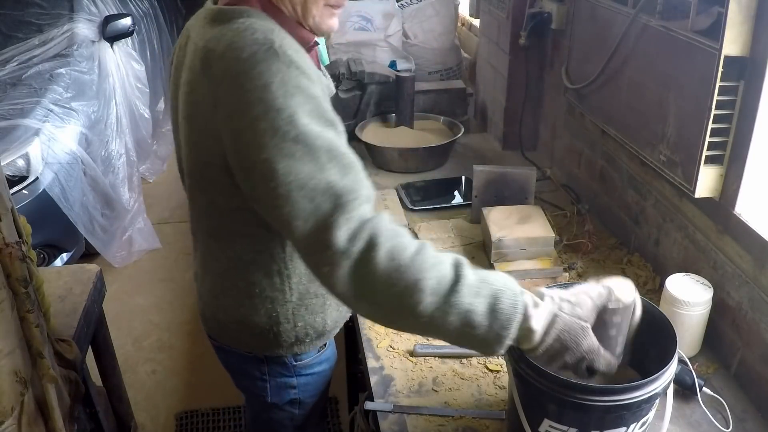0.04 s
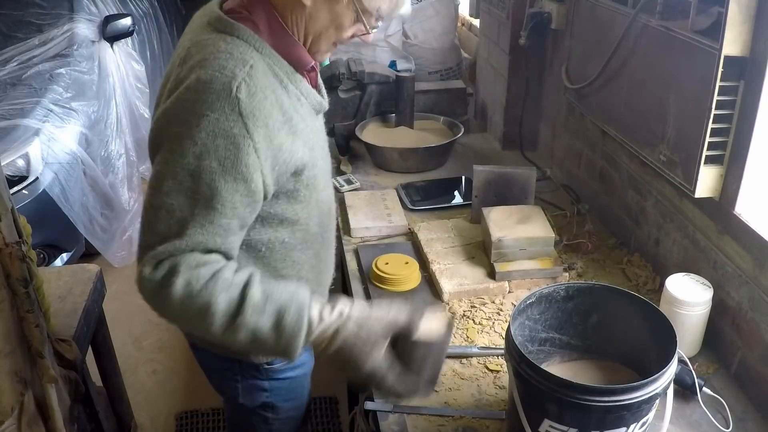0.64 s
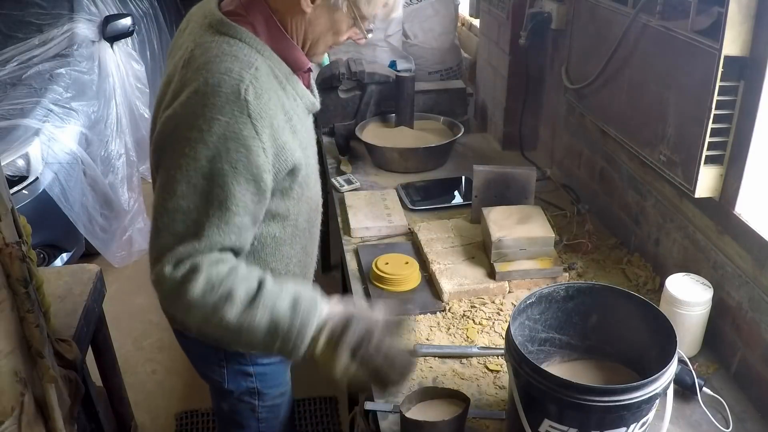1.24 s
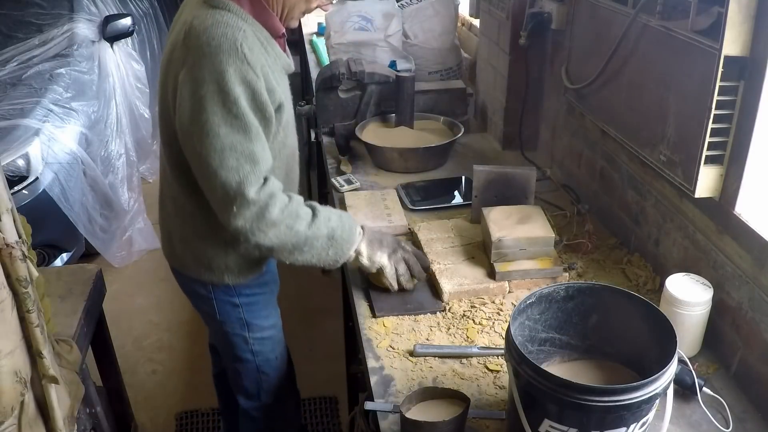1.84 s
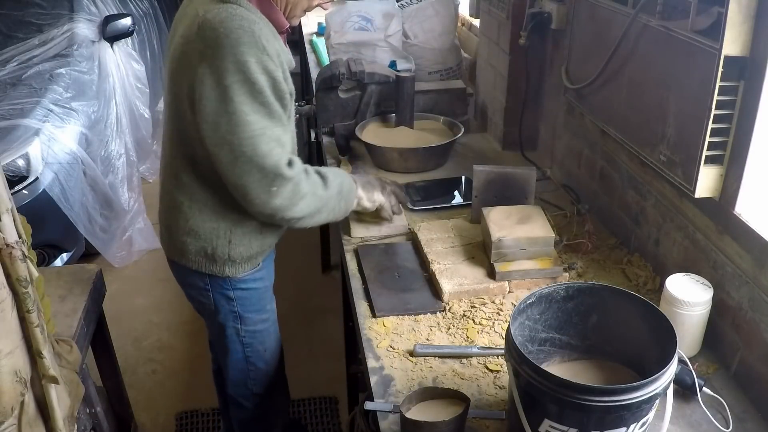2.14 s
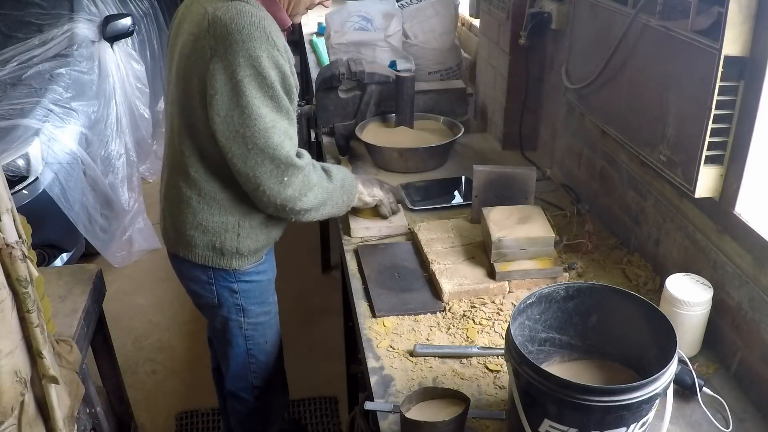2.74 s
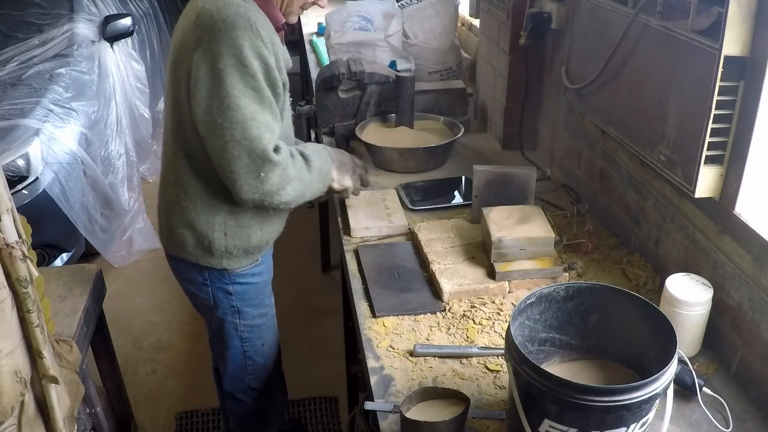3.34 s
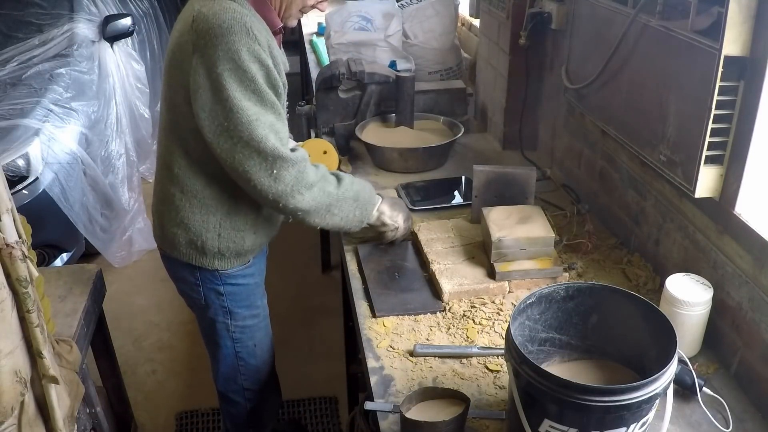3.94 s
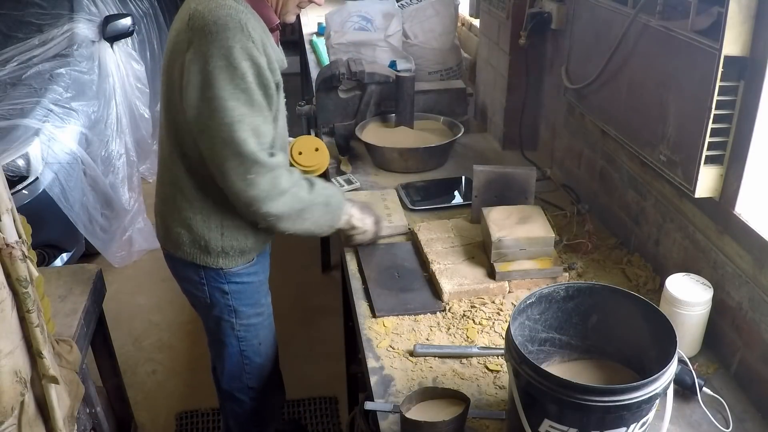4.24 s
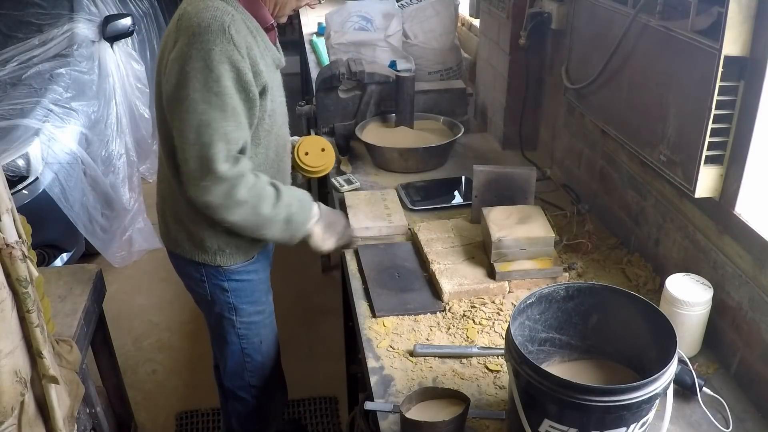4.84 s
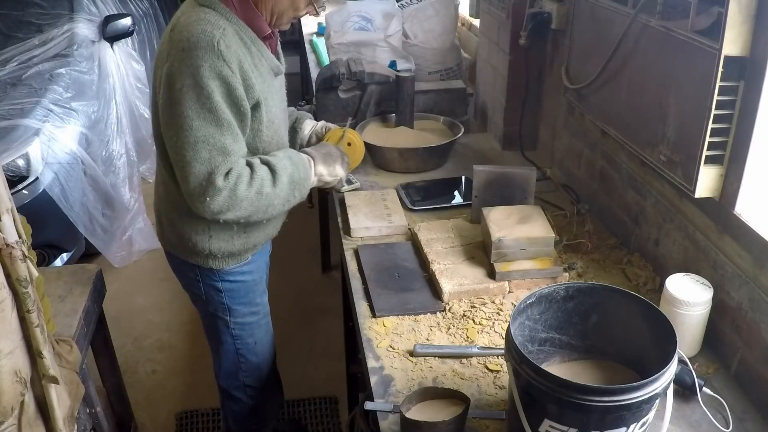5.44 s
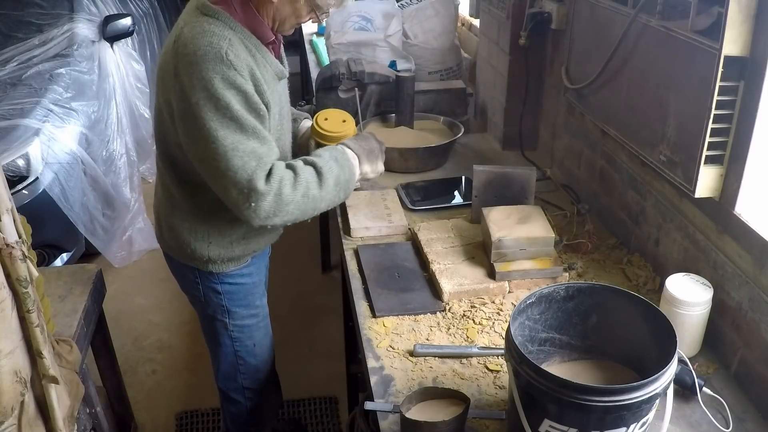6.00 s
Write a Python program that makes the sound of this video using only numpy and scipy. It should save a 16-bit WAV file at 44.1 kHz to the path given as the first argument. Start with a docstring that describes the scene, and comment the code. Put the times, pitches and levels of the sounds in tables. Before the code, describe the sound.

At the start a little sand trickles into a plastic bucket, with a scuff and a soft bump at 0.2 seconds. A sleeve rustles faintly around 0.5. At 1.1 a scoop is put down hard on a wooden bench, a loud double knock with a short skid. A brief gritty slide with a tick comes near 1.8, among soft glove rubs. At 2.5 a knock starts a prominent, hollow grinding of an object pushed over a sandy board, lasting until about 3.2. From 4.0 to 4.5, after soft thuds, a steel tool drags across a gritty plate, snapping crumbs, ringing faintly and ending with a knock. Short sweeping scrapes follow, with another knock at 5.0. Light, brighter scratches and ticks come from 5.5 to 5.8. Everything is close and fairly dry, over the faint air of a small workshop.

```python
"""Moulding work at a wooden bench in a small workshop, heard from close by.
First a scoop sheds sand into a plastic bucket, a sleeve rustles, and the scoop is put down hard.
Next a pattern is slid off a steel plate and ground over a sandy board, which rings hollow.
Last a steel tool is dragged across the gritty plate, ringing faintly, and scrapes the pattern's edge.
Friction is a train of grain impacts shaped by each body's resonances; blows excite damped modes."""
import sys
import numpy as np
from scipy import signal
from scipy.fft import rfft, irfft, next_fast_len
from scipy.io import wavfile
from scipy.ndimage import uniform_filter1d, map_coordinates

SR = 44100
rng = np.random.default_rng(int(sys.argv[2]) if len(sys.argv) > 2 else 0)


def to_wav(s):
    """Save 16-bit WAV."""
    ch = np.atleast_2d(s).T  # columns
    pcm = np.round(np.clip(ch, -1, 1) * 32767)  # PCM
    wavfile.write(sys.argv[1], SR, pcm.astype(np.int16))


N = 272097
TIME = np.arange(N) / SR
FFT_SIZE = next_fast_len(N + SR // 2, True)
HZ = np.fft.rfftfreq(FFT_SIZE, 1 / SR)

# Strokes of the steel tool: (start [s], length [s], crunch level [dB], hiss level [dB])
DRAG_STROKES = [(4.074, 0.038, -40, -44.5), (4.192, .15, -37, -39), (4.355, 0.056, -38, -35),
                (4.43, 0.045, -45, -54)]
SWEEP_STROKES = [(4.6, .035, -43, -56.5), (4.705, .04, -43, -52), (4.8, 0.13, -45.5, -52),
                 (4.835, 0.093, -37, -47), (4.945, 0.033, -31, -46)]
TRIM_STROKES = [(5.5295, 0.0047, -44, -41.5), (5.538, .03, -47, -46), (5.589, 0.074, -42.5, -49),
                (5.67, 0.051, -44, -43)]
DRAG_SHAPE = dict(attack_s=0.038, release_db_per_s=270)
SWEEP_SHAPE = dict(attack_s=0.02, release_db_per_s=330)
TRIM_SHAPE = dict(attack_s=0.002, release_db_per_s=1000)


def pattern_grind():
    """Forced vibration: sand crushed under the pattern drives the resonances of a hollow board."""
    # One long push: (time [s], crunch level [dB], hiss level [dB])
    push = [(2.485, -25, -40), (2.545, -40.5, -52), (2.621, -30, -36), (2.771, -30, -33),
            (2.803, -27.5, -35.5), (2.881, -27, -30.5), (2.979, -26.5, -35), (3.031, -28.5, -29.5),
            (3.117, -30, -36), (3.193, -62, -63), (3.26, -69, -70)]
    # Broad spectrum of the board: (frequency [Hz], level [dB])
    colour = [(120, -32), (200, -4), (248, 5), (370, 17), (550, -16), (804, -2), (1630, -11.5),
              (1850, -5.5), (2650, -39), (3670, -16.5), (15000, -40.5)]
    # Its deep, middle and high resonances: (frequency [Hz], half-width [Hz], level [dB])
    deep = [(108.6, 7.1, 15), (147, 18, 8), (249.7, 9.1, 12.5)]
    middle = [(118, 19, -26.5), (363, 370, 0), (777, 150, 5), (1843, 88, -15), (2423, 50, -12.5),
              (2997, 71, -10), (3650, 110, -10), (4280, 39, -14), (4830, 111, -17.5), (5600, 274, -17),
              (6450, 110, -40), (7160, 83, -24), (7560, 40, -42.5)]
    high = [(8730, 150, -1.5), (9300, 150, -6), (10340, 260, -3), (11850, 140, 1), (13500, 220, -3)]
    # Modes that ring on: (frequency [Hz], level [dB])
    modes = [(782, -43), (814, -42), (896, -35), (1782, -63), (2385, -71), (2968, -55), (3690, -65)]
    peaks = deep + middle + [(hz, width, db - 33) for hz, width, db in high]
    board = body(colour, peaks, broad_db=-7)
    board *= 1 - 1 / (1 + (HZ / 90) ** 8)  # little radiates below the lowest mode
    times, *columns = np.transpose(push)
    effort = [amp(np.interp(TIME, times, db, left=-np.inf, right=-np.inf)) for db in columns]
    grind = rub(effort, board, grains(rate=900, spread_db=1), fine_db=7.5, crunch_db=-0.5, hiss_db=1)
    return grind + ring(effort, modes, t60=0.13, width_hz=60, db=-4)


def pattern_slide():
    """Sliding friction: the pattern leaves the steel plate in a few short scrapes."""
    # (start [s], length [s], crunch level [dB], hiss level [dB])
    strokes = [(1.793, 0.049, -53, -57), (1.825, .043, -38.5, -43.5), (1.852, .014, -33, -48),
               (1.898, 0.03, -46, -53)]
    # Broad spectrum: (frequency [Hz], level [dB])
    colour = [(76, -41), (130, -29), (282, 0), (324, 7.5), (482, 5), (929, 5), (1380, -5.5), (1620, -25.5),
              (1940, -6), (2610, -37), (3000, -19), (4290, -15), (15000, -44.5)]
    # Resonances: (frequency [Hz], half-width [Hz], level [dB])
    peaks = [(330, 26, -6), (1370, 47, -21), (1830, 100, -17.5), (2370, 39, -16.5), (3030, 104, -19.5),
             (3680, 41, -20), (4320, 83, -23), (5400, 250, -26.5)]
    return rub(envelopes(strokes, attack_s=0.007, release_db_per_s=680), body(colour, peaks, broad_db=-12),
               grains(rate=1100, spread_db=4), fine_db=3, crunch_db=-1.5, hiss_db=0)


def tool_scrape():
    """Granular friction: the tool crushes grit on the plate, sweeps it, then trims the pattern."""
    # Broad spectrum of each contact: (frequency [Hz], level [dB])
    drag_colour = [(76, -31), (130, -1), (344, 5.5), (566, -0.5), (676, 1.5), (1360, -5), (1720, -17.5),
                   (2100, -10), (2360, -21), (3660, -25), (9880, -51.5), (11100, -47.5), (15000, -62)]
    sweep_colour = [(88, -53), (150, -26.5), (193, 1.5), (350, -2.5), (386, -1.5), (416, -13), (505, 4.5),
                    (612, -15), (1250, -19), (2700, -38), (3470, -33), (15000, -51)]
    trim_colour = [(320, -34), (550, -33), (983, -1), (1190, -14), (1430, -13.5), (2350, 0), (2740, -21.5),
                   (3610, -7.5), (3920, -6), (5540, -10), (6100, -14), (7310, -9), (8050, -20),
                   (13600, -12.5), (15000, -53)]
    # Resonances of each contact: (frequency [Hz], half-width [Hz], level [dB])
    drag_peaks = [(320, 67, 2), (1340, 77, -24), (1610, 26, -6), (1930, 55, -12), (2820, 190, -23),
                  (3700, 170, -17), (4200, 24, -35), (5060, 18, -23.5)]
    sweep_peaks = [(223, 120, -11.5), (743, 70, -11.5), (1000, 52, -14.5), (1305, 83, -14.5),
                   (1770, 110, -27), (2200, 100, -30.5)]
    trim_peaks = [(844, 150, -7), (1430, 105, -9), (1835, 78, -7.5), (2980, 110, -14), (3450, 124, -18),
                  (4130, 32, -7), (4900, 63, -5.5), (5660, 270, -8), (7140, 77, -9.5), (9300, 180, -17),
                  (11040, 71, -11.5), (13300, 35, -15), (13600, 36, -13)]
    drag = rub(envelopes(DRAG_STROKES, **DRAG_SHAPE), body(drag_colour, drag_peaks, broad_db=5),
               grains(rate=600, spread_db=1), fine_db=-9.5, crunch_db=1.5, hiss_db=2.5, judder_db=1.5)
    sweep = rub(envelopes(SWEEP_STROKES, **SWEEP_SHAPE), body(sweep_colour, sweep_peaks, broad_db=-4),
                grains(rate=1000, spread_db=1.5), fine_db=-4.5, crunch_db=-1, hiss_db=1)
    trim = rub(envelopes(TRIM_STROKES, **TRIM_SHAPE), body(trim_colour, trim_peaks, broad_db=-9.5),
               grains(rate=560, spread_db=2), fine_db=-2, crunch_db=-1, hiss_db=-1, judder_db=1.5)
    return drag + sweep + trim


def tool_ring():
    """Contact damping: pressed steel rings briefly; as the long drag ends it rings freely."""
    # Modes of the tool, held loosely or pressed on the pattern: (frequency [Hz], level [dB])
    loose = [(3343, -57.5), (4748, -57.5), (6492, -59.5), (6665, -61), (8554, -67.5), (8759, -69.5),
             (10815, -66), (11063, -73), (13302, -85), (13555, -73)]
    pressed = [(2380, -55.5), (3521, -55.5), (4140, -66.5), (5706, -73), (7200, -72), (13300, -68),
               (13600, -69)]
    damped = dict(t60=0.14, width_hz=110)
    dragged = ring(envelopes(DRAG_STROKES[1:2], **DRAG_SHAPE), loose, **damped, db=-4)
    free = ring(envelopes(DRAG_STROKES[2:], **DRAG_SHAPE), loose, t60=0.6, width_hz=45, db=3, steady=1.4)
    swept = ring(envelopes(SWEEP_STROKES[2:4], **SWEEP_SHAPE), loose, **damped, db=-8.5)
    trimmed = ring(envelopes(TRIM_STROKES, **TRIM_SHAPE), pressed, t60=0.17, width_hz=100, db=-2)
    return dragged + free + swept + trimmed


def bench_knocks():
    """Impact excitation: blows set the wooden bench ringing in its damped modes."""
    # (time [s], thud level [dB], thud centre [Hz], crack level [dB])
    blows = [(1.0745, -17.5, 182, -21), (1.1408, -25.5, 80, -17), (1.1422, -18, 197, -11.5),
             (1.1434, -23.5, 560, -4.5), (1.858, -41.5, 650, -26.5), (2.4785, -25, 696, -24.5),
             (2.481, -23, 170, -35.5), (3.974, -29.5, 94.5, -55.5), (4.054, -35, 95, -71),
             (4.446, -42, 330, -26.5), (4.451, -22, 177, -40), (4.977, -26, 340, -31)]
    # (frequency [Hz], level [dB], t60 [s])
    modes = [(79.8, -5.5, 0.32), (102.5, 5.5, 0.15), (167.3, -2.5, 0.089), (230.7, 3, 0.085),
             (326.6, 3, 0.11), (468, -0.5, 0.13), (596.4, -5, 0.25), (795, 4, 0.15), (1123, -13, 0.15),
             (1360, -13.5, .2), (1920, -11.5, 0.19)]
    return strike(blows, modes, crack_t60=0.024, rattle_db=-27.5, click_db=12)


def bucket():
    """Shell vibration: falling sand, the scuffing scoop and two bumps excite the plastic wall."""
    # (start [s], length [s], crunch level [dB], hiss level [dB])
    pours = [(-0.012, 0.24, -51, -57)]
    scuffs = [(.075, 0.025, -47.5, -53), (.212, .031, -32.5, -49)]
    # Broad spectrum of the wall: (frequency [Hz], level [dB])
    colour = [(180, -38), (300, -12), (691, -9), (884, -4.5), (1080, -9), (1400, -10.5), (1820, -11),
              (3020, -9), (4320, -20.5), (5900, -21), (15000, -30.5)]
    # Resonances when rubbed: (frequency [Hz], half-width [Hz], level [dB])
    peaks = [(923, 40, 0.5), (1380, 38, -4), (1710, 67, -32), (2080, 140, -7.5)]
    # (time [s], thud level [dB], thud centre [Hz], crack level [dB])
    bumps = [(0.088, -34, 146, -44), (0.243, -26.5, 82, -58)]
    # Modes when struck: (frequency [Hz], level [dB], t60 [s])
    modes = [(54, -7, 0.14), (87, -0.5, 0.099), (234, -6.5, 0.11), (910, -6, .1)]
    pour = rub(envelopes(pours, attack_s=0.01, release_db_per_s=97), amp(along(colour)),
               grains(rate=2500, spread_db=1), fine_db=10, crunch_db=-4.5, hiss_db=1)
    wall = body(colour, peaks, broad_db=-6.5)
    scuff = rub(envelopes(scuffs, attack_s=0.051, release_db_per_s=2800), wall,
                grains(rate=4000, spread_db=1.5), fine_db=3.5, crunch_db=2.5, hiss_db=5.5)
    return pour + scuff + strike(bumps, modes, crack_t60=0.05, rattle_db=-25, click_db=16)


def scoop():
    """Resonance and friction: the carried scoop sings; a faint rush precedes its knock, then it skids."""
    # (start [s], length [s], level [dB])
    song_span = [(.83, .13, -72)]
    # A faint rush of noise just before the knock, then the scoop's skid:
    # (start [s], length [s], crunch level [dB], hiss level [dB])
    bursts = [(1.045, .025, -59, -62.5), (1.1, 0.058, -30.5, -41), (1.243, .015, -44.5, -55.5)]
    # Their spectrum: (frequency [Hz], level [dB])
    colour = [(76, -28.5), (130, -4), (395, -8.5), (533, -12.5), (1470, -14), (1720, -21), (2940, -24),
              (3960, -31.5), (5450, -36.5), (15000, -49)]
    start_hz, sag_hz_per_s = 1780, 330
    pitch = start_hz - sag_hz_per_s * np.clip(TIME - song_span[0][0], 0, 1)
    song = envelopes(song_span, attack_s=0.033, release_db_per_s=150)[0] * waver(pitch, width_hz=240)
    rush_and_skid = rub(envelopes(bursts, attack_s=0.009, release_db_per_s=250), amp(along(colour)),
                        grains(rate=2500, spread_db=6), fine_db=0, crunch_db=0, hiss_db=1.5)
    return song + rush_and_skid


def grit():
    """Brittle fracture: single crumbs snap under glove and tool, each in a brief burst of noise."""
    # (time [s], level [dB])
    ticks = [(0.633, -43), (0.807, -41.5), (1.904, -29), (4.108, -28), (4.23, -24.5), (4.284, -22),
             (4.329, -24.5), (4.396, -17.5), (4.415, -18.5), (5.682, -26), (5.835, -41.5)]
    colour = [(300, -12), (1100, 12), (3000, 4.5), (6000, 1), (9000, -25.5), (15000, -20.5)]  # [Hz], [dB]
    t60 = 0.016
    t = np.arange(SR // 50) / SR
    snaps = np.zeros(N + SR)
    for start, db in ticks:
        snaps[round(start * SR):][:len(t)] += amp(db - 14 - 60 * t / t60) * rng.standard_normal(len(t))
    return filtered(snaps[:N], minimum_phase(amp(along(colour))))


def cloth():
    """Fabric friction: the sleeve rustles as the arm swings back, and the glove rubs."""
    # (start [s], length [s], crunch level [dB], hiss level [dB])
    sleeve = [(.44, 0.094, -58.5, -63.5)]
    glove = [(1.625, 0.19, -57, -73), (2.025, 0.033, -55, -66), (2.058, .033, -45.5, -56.5),
             (5.167, 0.017, -58, -66), (5.304, 0.013, -65.5, -68), (5.403, .015, -73.5, -65.5)]
    # Broad spectrum: (frequency [Hz], level [dB])
    colour = [(240, -24.5), (400, -13), (900, -6), (1020, -6.5), (1180, -12), (1300, -8), (1910, -18),
              (3290, -22.5), (4310, -37), (12000, -43), (15600, -85), (22000, -120)]
    # Resonances: (frequency [Hz], half-width [Hz], level [dB])
    peaks = [(1030, 58, -21.5), (1230, 92, 10)]
    effort = envelopes(sleeve, attack_s=0.097, release_db_per_s=70)
    effort += envelopes(glove, attack_s=0.0033, release_db_per_s=210)
    return rub(effort, body(colour, peaks, broad_db=26), grains(rate=1100, spread_db=1.5),
               fine_db=-12.5, crunch_db=-3.5, hiss_db=-0.5)


def bench_sway():
    """Structure-borne sound: handling sways the bench, heard as a deep rumble."""
    # (start [s], length [s], level [dB])
    sways = [(0, 0.23, -56.5), (.2, 0.034, -45.5), (1.06, 0.16, -37.5), (3.97, 0.34, -50),
             (4.44, 0.045, -46)]
    # Rumble spectrum: (frequency [Hz], level [dB])
    colour = [(10, -4), (18, 5), (28, -0.5), (45, -7), (62, -16), (90, -33.5), (160, -78)]
    rumble = filtered(rng.standard_normal(N), amp(along(colour)))
    running_rms = np.sqrt(np.abs(uniform_filter1d(rumble ** 2, size=SR // 12)) + 1e-20)
    return amp(5.5) * envelopes(sways, attack_s=0.028, release_db_per_s=90)[0] * rumble / running_rms


def workshop(x, wet_db):
    """Reverberation: the near walls answer after 4 ms, with a decay that depends on frequency."""
    # (frequency [Hz], t60 [s])
    decay_times = [(100, 0.51), (500, 0.074), (3000, 0.23), (12000, 0.083)]
    hz, t, noise = signal.stft(rng.standard_normal(SR // 2), SR, nperseg=256)
    decay = amp(-60 * t / along(decay_times, hz)[:, None])
    tail = signal.istft(noise * decay, SR, nperseg=256)[1]
    tail = np.pad(tail / np.linalg.norm(tail), (SR // 250, 0))
    return (x + amp(wet_db) * signal.fftconvolve(x, tail)[:N]) / np.hypot(1, amp(wet_db))


def background():
    """Ambient noise: still workshop air, with faint hiss uncorrelated between the ears."""
    # Spectrum of the air: (frequency [Hz], level [dB])
    colour = [(12, -32), (20, -2), (90, -2), (125, -4.5), (258, -4.5), (391, -9.5), (531, -14.5),
              (828, -14), (900, -17), (1850, -27), (2190, -26), (5470, -33.5), (14100, -40.5),
              (15300, -33.5)]
    air = filtered(rng.standard_normal(N), amp(along(colour)))
    drift = amp(-59 + 1.5 * wobble(4.9))
    return drift * air / rms(air) + amp(-72.5) * rng.standard_normal((2, N))


def rub(effort, gain, coarse, fine_db, crunch_db, hiss_db, judder_db=1):
    """Stick-slip friction: juddering grains drive a body, as crunch below 1500 Hz and hiss above."""
    crunch, hiss = effort
    low_share = 1 / (1 + (HZ / 1500) ** 6)
    fine = grains(rate=9000, spread_db=0)
    judder = amp(judder_db * wobble(220))
    bands = (crunch * amp(crunch_db), low_share, 0.35), (hiss * amp(hiss_db), 1 - low_share, amp(fine_db))
    sound = 0
    for level, share, fine_gain in bands:
        drive = judder * (coarse + fine_gain * fine)
        band = gain * np.sqrt(share)
        sound += filtered(level * drive / rms(drive), minimum_phase(band / rms(band)))
    return sound


def grains(rate, spread_db):
    """Poisson process: about rate grains break each second, with log-normal sizes; rms 1."""
    chance, size, sign = rng.random(N), rng.standard_normal(N), rng.choice([-1, 1], N)
    train = (chance < rate / SR) * sign * amp(spread_db * np.clip(size, -2, 2))
    return train / rms(train)


def body(colour, peaks, broad_db):
    """Frequency response of a rubbed body: Lorentzian resonances on a broad spectrum."""
    resonances = sum(amp(db) / (1 + ((HZ - hz) / width) ** 2) for hz, width, db in peaks)
    return amp(along(colour) + broad_db) + resonances


def ring(effort, modes, t60, width_hz, db, steady=0):
    """Energy storage: lightly damped modes take up the scraping and release it exponentially."""
    retained = amp(-120 / (t60 * SR))  # share of the energy left after one sample
    hiss_power = effort[1] ** 2
    swell = np.sqrt(signal.lfilter([1 - retained], [1, -retained], hiss_power))
    tones = sum(amp(level) * waver(hz, width_hz, steady) for hz, level in modes)
    return amp(db) * tones * swell / swell.max()


def strike(blows, modes, crack_t60, rattle_db, click_db):
    """Modal superposition: a blow rings the modes near its centre pitch, clicks and cracks the grit."""
    # Spectrum of the crack: (frequency [Hz], level [dB])
    crack_colour = [(76, -36.5), (130, -5), (227, 3), (380, -9.5), (612, -0.5), (893, -9), (1230, -2.5),
                    (1650, -23.5), (1940, -7), (2360, -15.5), (3250, -16.5), (3960, -28), (7790, -42),
                    (12100, -31), (15000, -45)]
    bright_hz, db_per_octave, rattle_t60 = 16370, 21, 0.19
    t = np.arange(SR // 2) / SR
    tones = np.array([(-1) ** k * amp(-60 * t / t60) * np.sin(2 * np.pi * hz * t)
                      for k, (hz, _, t60) in enumerate(modes)])
    thuds, cracks = np.zeros((2, N + SR))
    for start, thud_db, centre_hz, crack_db in blows:
        span = slice(round(start * SR), round(start * SR) + len(t))
        weights = np.array([amp(db) / (1 + np.log2(hz / centre_hz) ** 2) ** 2 for hz, db, _ in modes])
        thuds[span] += amp(thud_db) * (weights / np.linalg.norm(weights)) @ tones
        decay = 0.5 * amp(-60 * t / crack_t60) + amp(rattle_db - 60 * t / rattle_t60)
        burst = decay * rng.standard_normal(len(t))
        burst[0] += amp(click_db)
        cutoff_hz = bright_hz * 2 ** (crack_db / db_per_octave)  # a softer contact is duller
        pole = np.exp(-2 * np.pi * cutoff_hz / SR)
        cracks[span] += amp(crack_db) * signal.lfilter([1 - pole], [1, -pole], burst)
    gain = amp(along(crack_colour))
    return thuds[:N] + filtered(cracks[:N], minimum_phase(gain / rms(gain)))


def envelopes(strokes, attack_s, release_db_per_s):
    """Amplitude envelopes, one per level column: each stroke swells, holds and decays exponentially."""
    gains = 0
    for start, length, *dbs in strokes:
        rise = np.sin(np.pi / 2 * np.clip((TIME - start) / attack_s, 0, 1)) ** 2
        fall = amp(-release_db_per_s * np.clip(TIME - start - length, 0, 1))
        gains = np.maximum(gains, np.outer(amp(dbs), rise * fall))
    return gains


def waver(hz, width_hz, steady=0):
    """Narrow-band noise of rms 1, around a steady tone if the mode rings freely."""
    phase = 2 * np.pi * np.cumsum(hz * np.ones(N)) / SR
    line = (steady + wobble(width_hz)) * np.sin(phase) + wobble(width_hz) * np.cos(phase)
    return line / rms(line)


def wobble(rate):
    """Random modulation: rate Gaussian values a second, joined by straight lines."""
    return map_coordinates(rng.standard_normal(int(N * rate / SR) + 4), [TIME * rate], order=1)


def minimum_phase(gain):
    """Causality: folding the cepstrum gives a response that rings only after its excitation."""
    cepstrum = irfft(np.log(np.maximum(gain, 1e-6)), FFT_SIZE)
    cepstrum[1:FFT_SIZE // 2] *= 2
    cepstrum[FFT_SIZE // 2 + 1:] = 0
    return np.exp(rfft(cepstrum))


def filtered(x, response):
    """Linear filtering: the spectrum of x times a frequency response."""
    return irfft(rfft(x, FFT_SIZE) * response, FFT_SIZE)[..., :N]


def along(points, hz=HZ):
    """Interpolation of (frequency [Hz], value) points on a logarithmic frequency axis."""
    frequencies, values = np.transpose(points)
    return np.interp(np.log(hz + 1), np.log(frequencies + 1), values)


def amp(db):
    """Decibels to amplitude ratio."""
    return 10 ** (np.asarray(db) / 20)


def rms(x):
    """Root mean square."""
    return np.sqrt(np.mean(x ** 2) + 1e-20)


def scene():
    """Superposition at two closely spaced microphone ports: almost mono, with a weak side signal."""
    # Side relative to mid, for the sounds given slight stereo width: (frequency [Hz], level [dB])
    side_levels = [(100, -71), (380, -51.5), (700, -56.5), (1280, -31.5), (4000, -28), (8000, -19.5),
                   (15000, -22)]
    side_phase_rad = 2.5
    wide = workshop(bench_knocks(), wet_db=-12)
    wide += workshop(pattern_grind() + pattern_slide() + bucket() + scoop(), wet_db=-14)
    centred = workshop(tool_scrape() + tool_ring() + grit() + cloth(), wet_db=-12.5)
    mid = wide + centred + bench_sway()
    side = filtered(wide, np.exp(1j * side_phase_rad) * amp(along(side_levels)))
    return np.array([mid + side, mid - side]) + background()


def record(dry):
    """Band limiting: an ideal low-pass filter removes the highest treble."""
    return filtered(dry, HZ < 15400)


dry = scene()
out = record(dry)
to_wav(out)
```